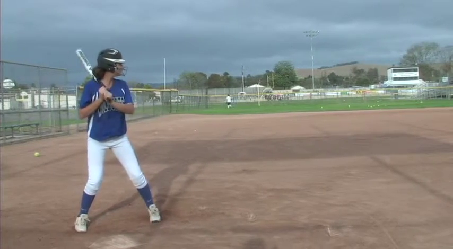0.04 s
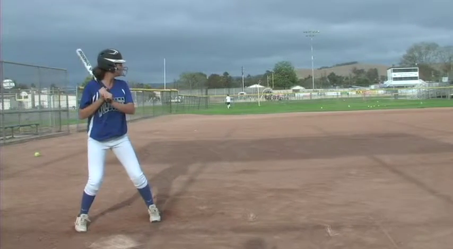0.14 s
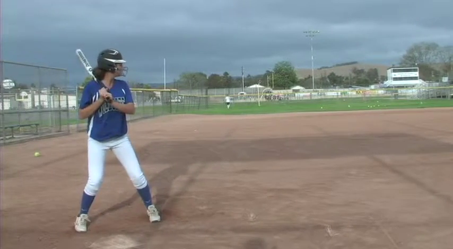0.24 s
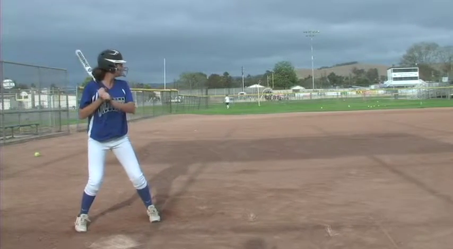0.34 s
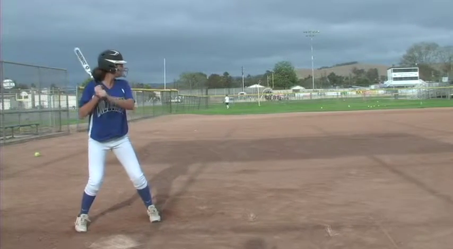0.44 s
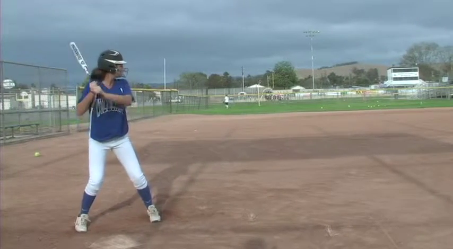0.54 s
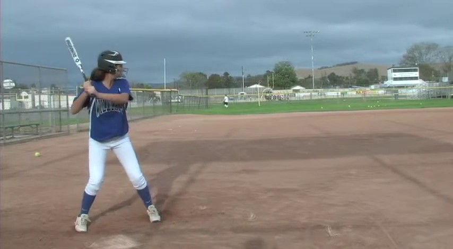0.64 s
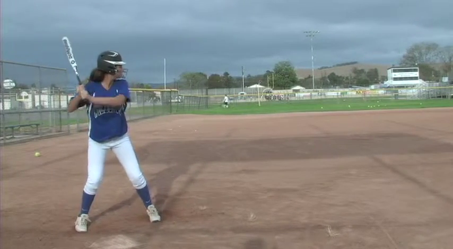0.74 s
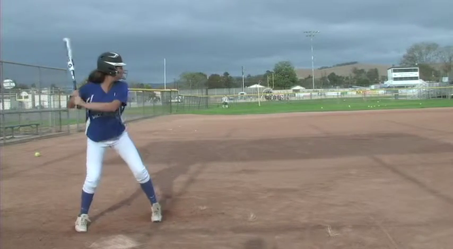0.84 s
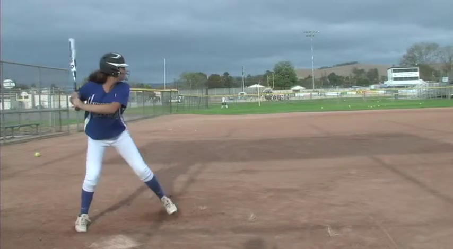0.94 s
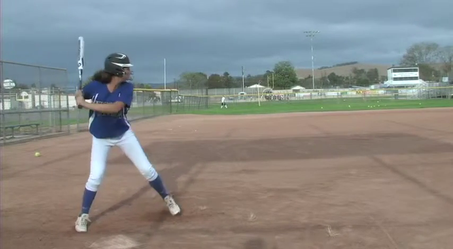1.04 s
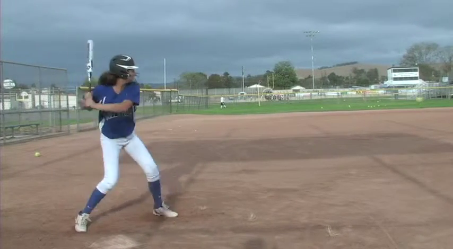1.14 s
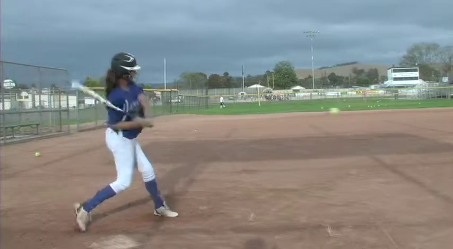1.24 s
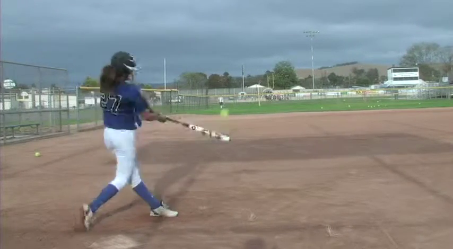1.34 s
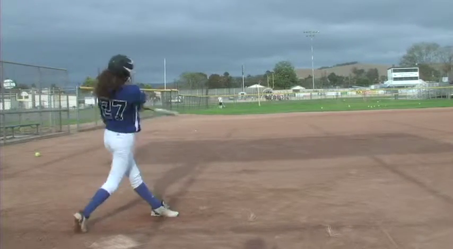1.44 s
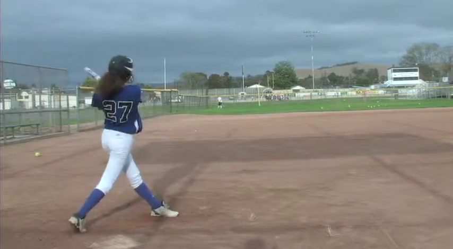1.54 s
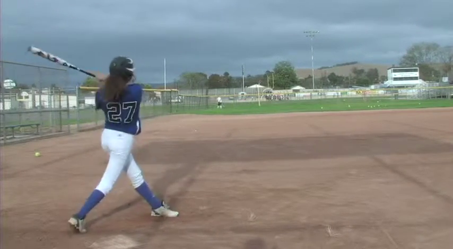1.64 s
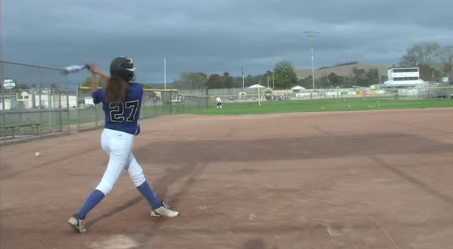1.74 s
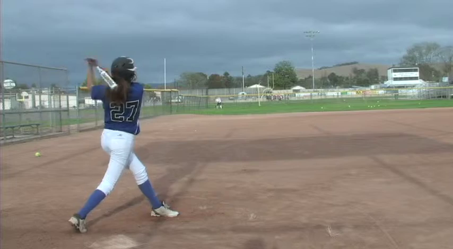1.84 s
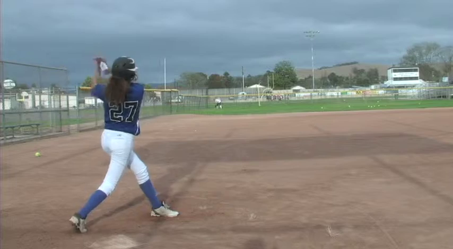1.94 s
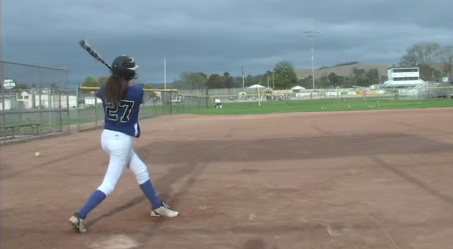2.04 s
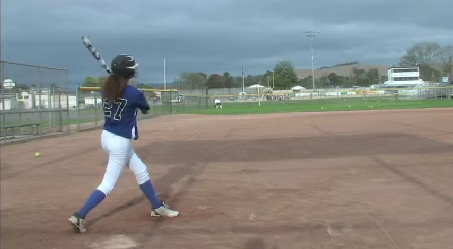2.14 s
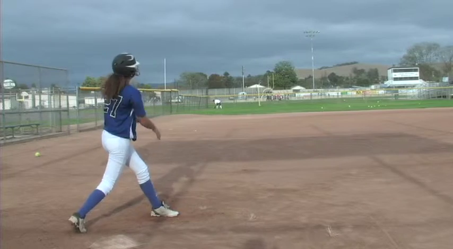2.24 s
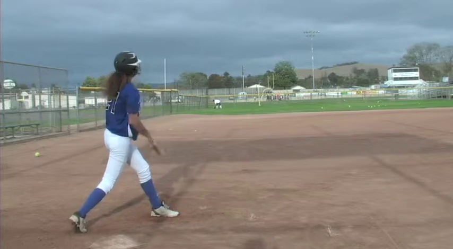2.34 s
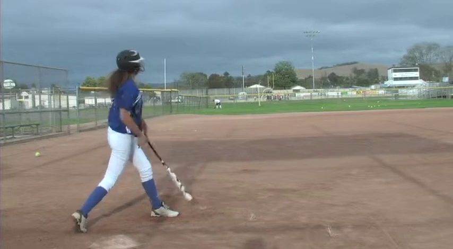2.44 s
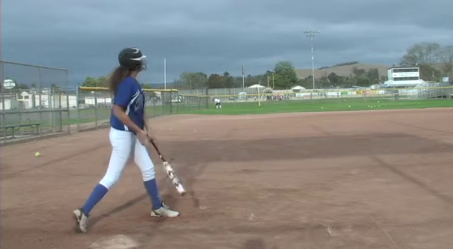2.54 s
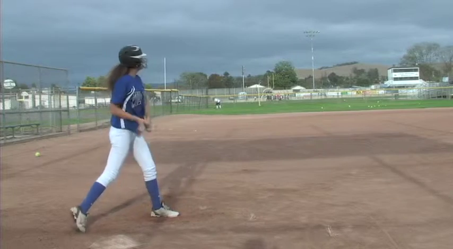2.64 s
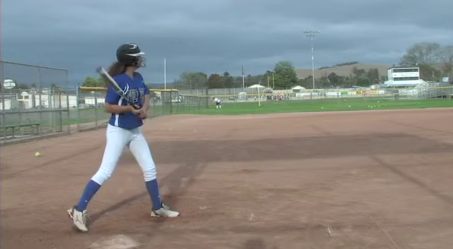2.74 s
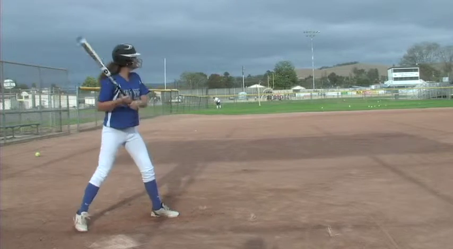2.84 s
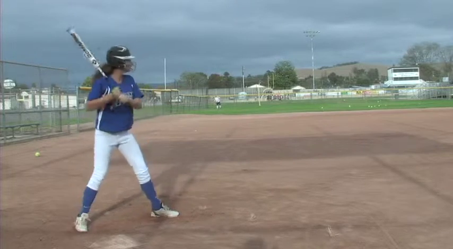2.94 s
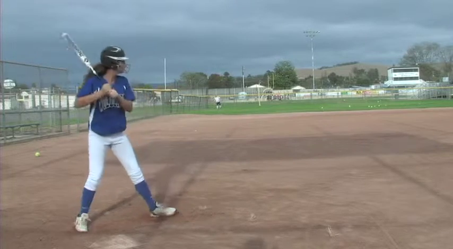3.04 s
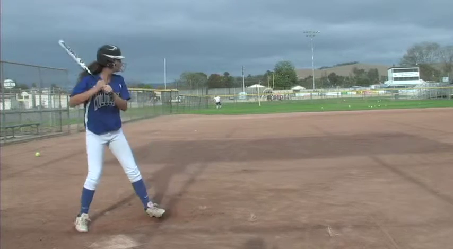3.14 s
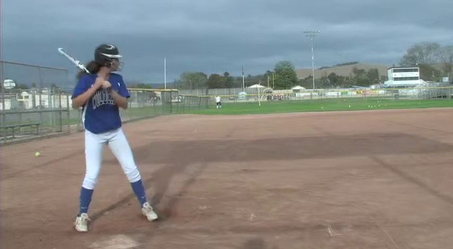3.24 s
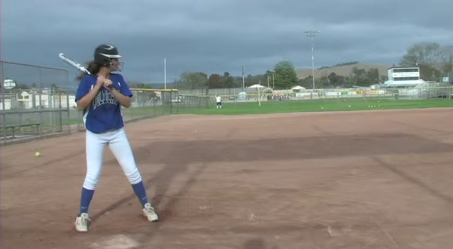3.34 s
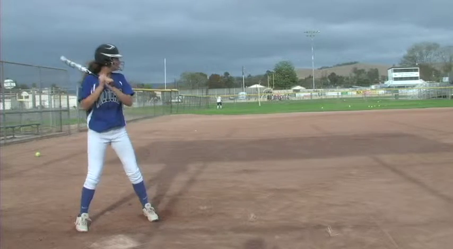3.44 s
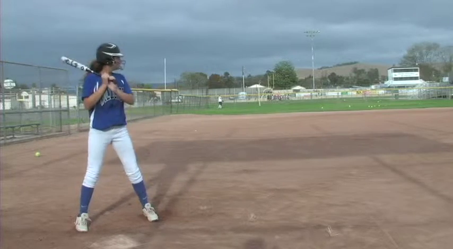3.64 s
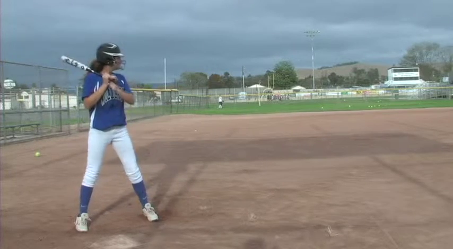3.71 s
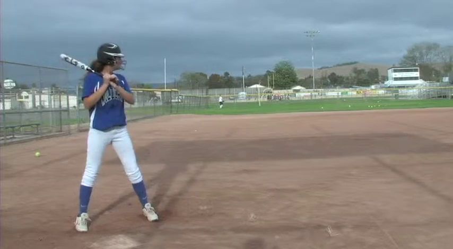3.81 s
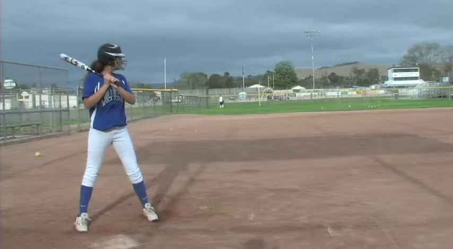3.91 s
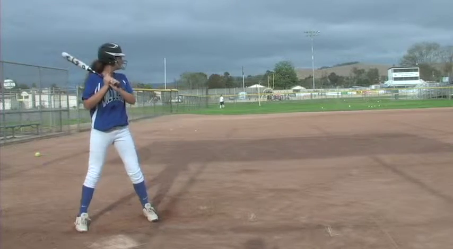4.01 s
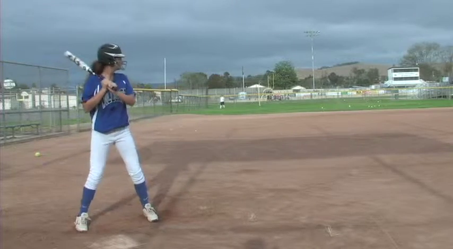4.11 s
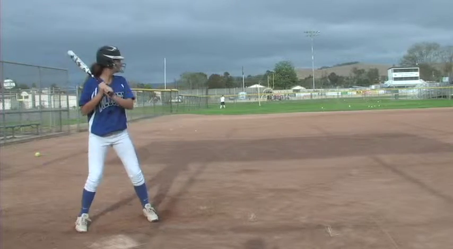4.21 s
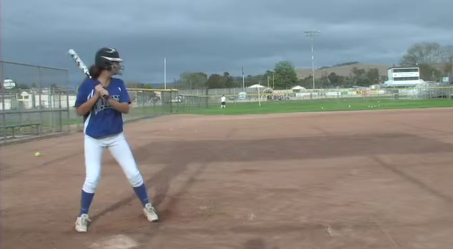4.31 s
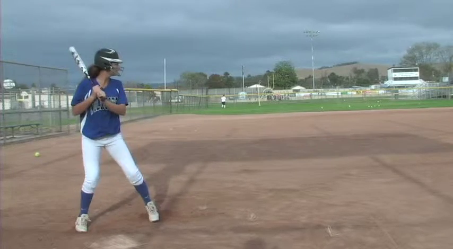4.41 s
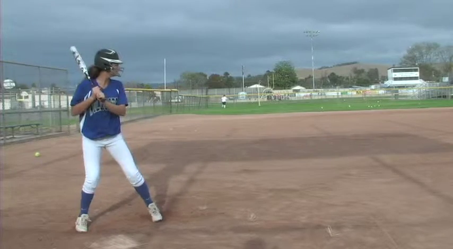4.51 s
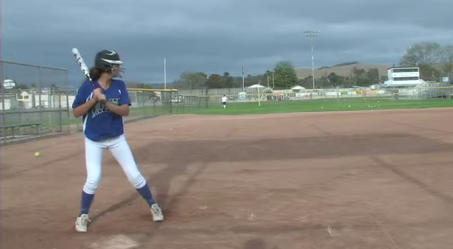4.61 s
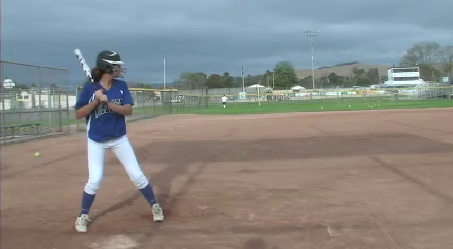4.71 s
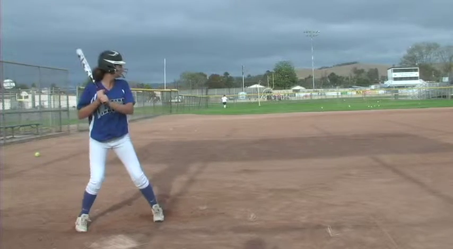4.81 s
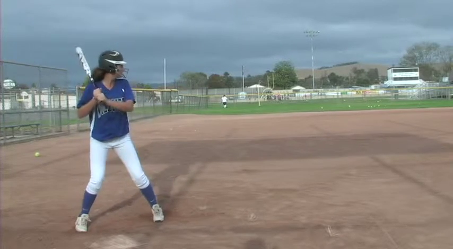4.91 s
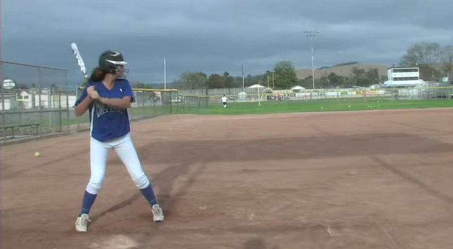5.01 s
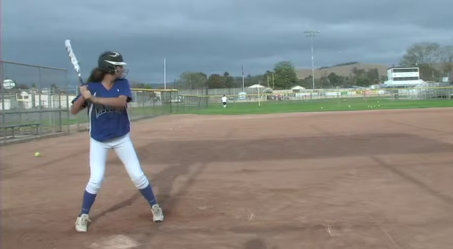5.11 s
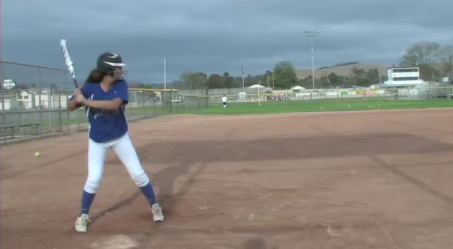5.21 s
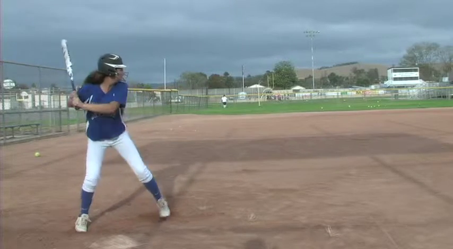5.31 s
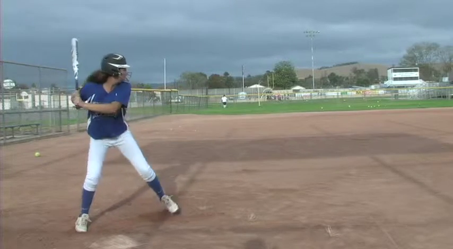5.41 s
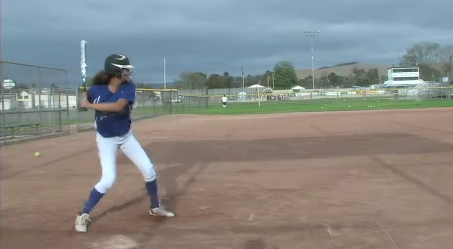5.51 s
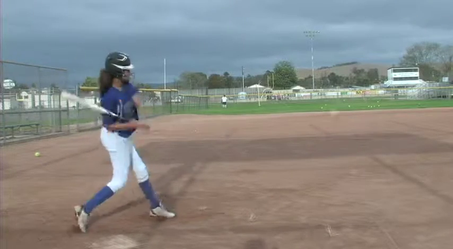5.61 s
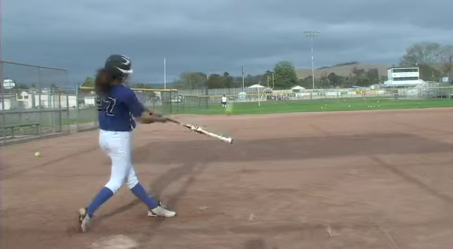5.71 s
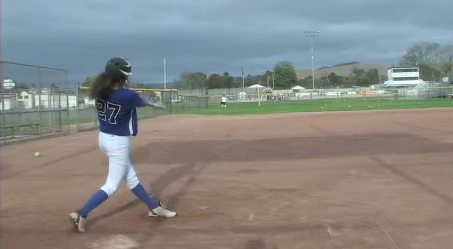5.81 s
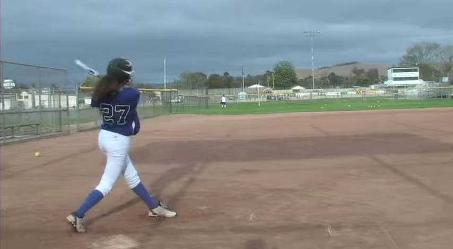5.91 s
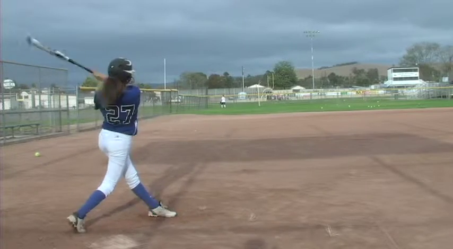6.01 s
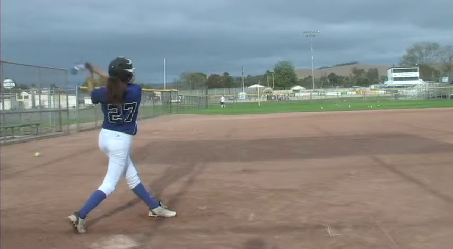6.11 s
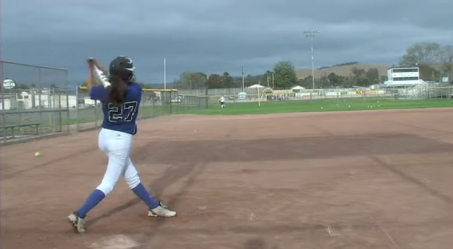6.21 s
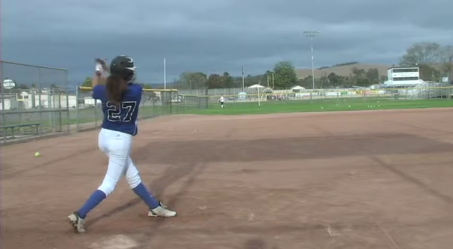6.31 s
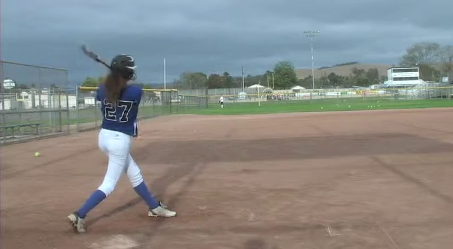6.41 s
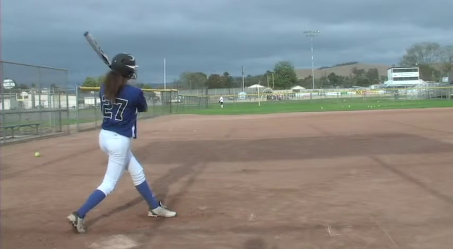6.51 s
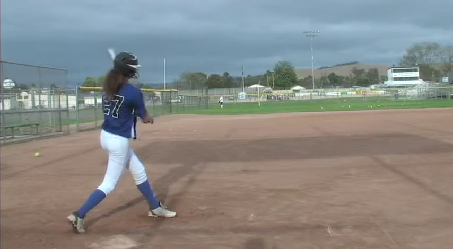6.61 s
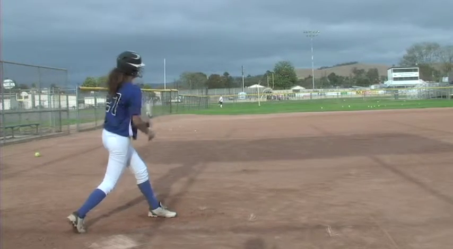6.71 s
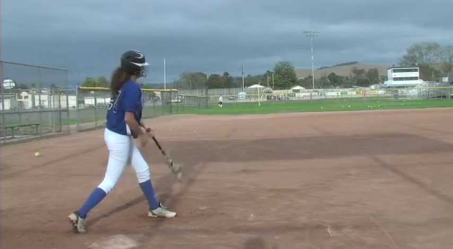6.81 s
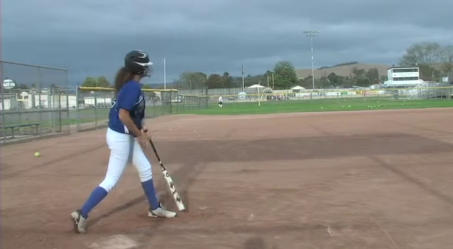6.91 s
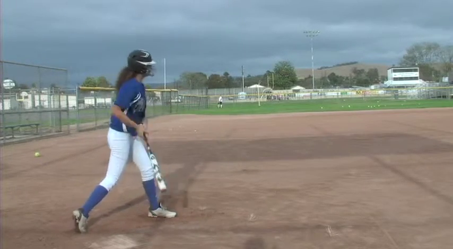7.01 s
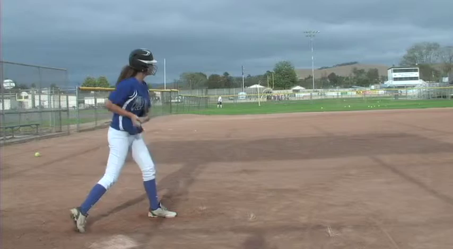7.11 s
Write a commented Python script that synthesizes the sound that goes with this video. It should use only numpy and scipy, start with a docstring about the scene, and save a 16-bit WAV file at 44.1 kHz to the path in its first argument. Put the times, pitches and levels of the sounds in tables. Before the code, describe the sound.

On an open softball field, a pitching machine hums quietly under a dull outdoor rush and light hiss. It fires a ball with a zip and a rubbery knock, and half a second later a bat cracks loudly close to the microphone, ringing briefly with quick echoes off the fences. Cleats scuff the dirt faintly. After about four seconds the knock and crack repeat.

```python
"""Batting practice on an open softball field.

From behind the plate: a humming wheel machine spits two balls, each with a zip and a rubbery knock.
Half a second later the bat cracks and rings close to the microphone, overloading it, and the cage
and fences throw back quick echoes. Cleats scuff the dirt over a dull rush and a light hiss;
a thin squeal comes and goes far off, and a puff of wind reaches the microphone at the end."""
import sys
import numpy as np
from scipy import signal
from scipy.fft import rfft, irfft, next_fast_len
from scipy.io import wavfile
from scipy.ndimage import map_coordinates

SR = 44100
rng = np.random.default_rng(int(sys.argv[2]) if len(sys.argv) > 2 else 0)


def file_out(sig):
    """Save sig as 16-bit WAV at sys.argv[1]."""
    # one column per channel
    cols = np.atleast_2d(sig).T
    # limit, then scale
    lim = np.clip(cols, -1, 1)
    pcm = np.round(lim * 32767).astype(np.int16)
    wavfile.write(sys.argv[1], SR, pcm)


N = 315315
WHEEL_HZ = 45.79  # turns a second of the machine's wheels
# Bat on ball. Each row: contact in seconds, level in dB, brightness in dB per octave,
# the barrel's hoop mode in dB, the swing's whoosh in dB.
BAT_HITS = [(1.3749, 8, -0.2, -11, -39), (5.7420, 7, -1.5, -44, -54)]
# Sound scattered around the field. Each row: frequency in Hz, relative level in dB.
SCATTER_SPECTRUM = [(90, 13), (200, -4), (320, 14), (550, 9.5), (900, -8.5), (1400, -4.5), (2200, -11),
                    (5500, -20), (11000, -13.5), (16000, -36)]


def amp(db):
    """Decibels to gain."""
    return 10 ** (np.asarray(db) / 20)


def unit(x):
    """Scale to rms 1."""
    return x / np.sqrt(np.mean(x ** 2) + 1e-20)


def clock(count):
    """Seconds for count samples."""
    return np.arange(count) / SR


def colour(x, spectrum):
    """Filter x by a curve of (Hz, dB) points and scale it to rms 1."""
    points_hz, points_db = np.transpose(spectrum)
    size = next_fast_len(len(x) + SR // 4)
    hz = np.fft.rfftfreq(size, 1 / SR)
    gain = amp(np.interp(np.log(hz + 1), np.log(points_hz), points_db)) * (hz > points_hz[0] / 2)
    return unit(irfft(rfft(x, size) * gain, size)[:len(x)])


def noise(spectrum, count):
    """Coloured noise of rms 1."""
    return colour(rng.standard_normal(count), spectrum)


def cut_bass(x, corner_hz):
    """First-order high-pass."""
    return signal.sosfilt(signal.butter(1, corner_hz, "high", fs=SR, output="sos"), x)


def wobble(rate):
    """A smooth random curve, rate knots a second."""
    coarse = clock(N)[::64]
    knots = rng.standard_normal(N // 100)
    return np.interp(clock(N), coarse, map_coordinates(knots, [coarse * rate], order=2, mode="wrap"))


def add(track, start, x):
    """Mix x into the track from start, in seconds."""
    part = track[max(round(start * SR), 0):][:len(x)]
    part += x[:len(part)]


def echoed(x, walls, bass_hz, treble_hz):
    """x and its echoes; each surface returns its own share of bass and treble."""
    bass = signal.sosfilt(signal.butter(3, bass_hz, fs=SR, output="sos"), x)
    treble = signal.sosfilt(signal.butter(2, treble_hz, "high", fs=SR, output="sos"), x)
    out = x.copy()
    for delay, bass_db, treble_db in walls:
        add(out, delay, amp(bass_db) * bass + amp(treble_db) * treble)
    return out


def ring(modes, t, attack):
    """Damped modes that build up over the contact time."""
    tones = sum(amp(db - 60 * t / t60) * np.sin(2 * np.pi * hz * t) for hz, db, t60 in modes)
    return tones * (1 - np.exp(-t / attack))


def snap(spectrum, t, decay):
    """A dense click: a noise burst, flattened in spectrum, then faded and coloured."""
    bins = rfft(rng.standard_normal(len(t)) * amp(-60 * t / decay))
    flat = irfft(bins / (np.abs(bins) + 1e-12), len(t))
    return colour(flat * amp(-10 * t / decay), spectrum)


def field_air(rush_db=-43.5, rise_db_per_s=0.0472, unrest_db=0.66, hiss_lift_db=1.0, throb_db=1.06):
    """The open field's dull rush, and a hiss that swells slowly and throbs with the spinning wheels."""
    # Rush and hiss. Each row: frequency in Hz, relative level in dB.
    rush_spectrum = [(25, -27), (45, 3.5), (75, -5), (110, 4), (250, 1), (470, 0), (650, 1.5), (1000, -6.5),
                     (1400, -6.5), (1950, -13.5), (2450, -12.5), (3200, -19), (8000, -33.5)]
    hiss_spectrum = [(1500, -30), (3200, -1), (5200, 2.5), (6300, 1.5), (8300, 0), (9200, -5),
                     (10200, -6.5), (12300, -16), (13500, -16), (14100, -29), (16000, -32)]
    # The hiss's swells. Each row: time in seconds, relative level in dB.
    swells = [(0, -54), (.55, -52.5), (.8, -55.5), (1.02, -50), (1.7, -51.5), (2.43, -54), (2.9, -50),
              (3.3, -53.5), (3.66, -49.5), (3.98, -55.5), (5.04, -51.5), (6.03, -52.5), (6.3, -50.5),
              (6.8, -52), (7.15, -49)]
    t = clock(N)
    rush = amp(rush_db + rise_db_per_s * t + unrest_db * wobble(19)) * noise(rush_spectrum, N)
    throb = throb_db * np.cos(2 * np.pi * WHEEL_HZ * t)
    hiss_db = np.interp(t, *np.transpose(swells)) + hiss_lift_db + throb
    return rush + amp(hiss_db) * noise(hiss_spectrum, N)


def machine_hum(motor_hz=53.5, motor_db=-59, flutter_db=2.0, tick_db=-61, drift=0.000882, waver=0.017):
    """The machine hums on multiples of its wheel speed; a wheel ticks once a turn, a fine high buzz."""
    # The hum's outline and the motors' high whine. Each row: frequency in Hz, rms level in dB.
    hum_outline = [(92, -51), (137, -52.5), (183, -48.5), (275, -50), (325, -55.5), (460, -62), (590, -53),
                   (660, -65.5), (770, -59.5), (1100, -68.5), (1300, -63.5), (1600, -65), (1950, -75),
                   (2550, -69), (2750, -74)]
    whine = [(5060, -67.5), (6191, -70), (6374, -68.5), (7278, -76)]
    # A wheel's tick. Each row: frequency in Hz, relative level in dB, t60 in seconds.
    tick_modes = [(5980, 0, 0.01), (7200, -4, 0.0074), (9240, -1.5, 0.012), (11700, -5.5, 0.0077),
                  (13200, -10, .008)]
    shaft_time = clock(N) + np.cumsum(drift * wobble(2.5)) / SR
    orders_hz = WHEEL_HZ * np.arange(2, 60)
    hum_hz, hum_db = np.transpose(hum_outline)
    orders_db = np.interp(np.log(orders_hz), np.log(hum_hz), hum_db)
    hum = np.zeros(N)
    for hz, db in [(motor_hz, motor_db), *zip(orders_hz, orders_db), *whine]:
        phase = 2 * np.pi * (hz * shaft_time + rng.random())
        phase += waver * np.sqrt(hz) * wobble(7)  # each tone wavers on its way across the field
        hum += amp(db + flutter_db * wobble(2.9)) * np.sqrt(2) * np.sin(phase)
    turns = shaft_time * WHEEL_HZ + 0.0065 * wobble(60)
    ticks = unit(ring(tick_modes, turns % 1 / WHEEL_HZ, attack=0.00044))
    return hum + amp(tick_db + wobble(2.15) + wobble(40)) * ticks


def pitches(grip_s=0.0035, release_s=0.0018, knock_lead_s=0.00336,
            zip_tail_db=-28, zip_tail_t60=0.39, knock_tail_db=-27, knock_tail_t60=0.31):
    """Rubber grips the ball ever harder and lets go at once; the squeezed tyres spring back and ring."""
    # Balls leaving the wheels. Each row: release in seconds, zip in dB, knock in dB, zip's bass cut in Hz.
    releases = [(0.866, -6, -1.5, 600), (5.2317, -7, -2.2, 2550)]
    # The zip. Each row: frequency in Hz, relative level in dB.
    zip_spectrum = [(300, 8.5), (1200, -17), (2500, -11), (4000, -9), (6000, -1), (8500, -3), (12000, -10),
                    (16000, -32)]
    # Tyres and frame. Each row: frequency in Hz, relative level in dB, t60 in seconds.
    tyre_modes = [(172, -7.5, 0.19), (206.6, -15, 0.34), (269, -13, 0.053), (321.4, -2, 0.053),
                  (506, -41, 0.026), (690, -25.5, 0.095), (786, -22.5, 0.061)]
    # Echoes off the backstop. Each row: delay in seconds, bass in dB, treble in dB.
    backstop = [(0.0099, -23, -72), (0.0265, -55, -42), (0.0277, -21.5, -21.5), (.0322, -36, -9),
                (0.0618, -22, -40), (0.065, -53, -28)]
    out, t = np.zeros(N), clock(SR)
    run_up_s = 0.5
    since_release = t - run_up_s
    squeeze = np.exp(np.minimum(since_release / grip_s, -since_release / release_s))
    for start, zip_db, knock_db, edge_hz in releases:
        shot = amp(zip_db) * squeeze * cut_bass(noise(zip_spectrum, SR), edge_hz)
        knock = cut_bass(ring(tyre_modes, t, attack=0.0037), corner_hz=45)
        add(shot, run_up_s - knock_lead_s, -amp(knock_db) * knock)
        add(out, start - run_up_s, echoed(shot, backstop, bass_hz=1400, treble_hz=2800))
        zip_tail = amp(zip_db + zip_tail_db - 60 * t / zip_tail_t60) * noise(zip_spectrum, SR)
        knock_fade = amp(knock_db + knock_tail_db - 60 * t / knock_tail_t60)
        add(out, start, zip_tail + knock_fade * noise(SCATTER_SPECTRUM, SR))
    return out


def flight_and_swing(ball_db=-43, approach_s=0.3, depart_s=0.045, sweep_s=0.03):
    """The spinning ball hisses louder as it nears the plate; the bat whooshes around the contact."""
    # Air past ball and bat. Each row: frequency in Hz, relative level in dB.
    whoosh_spectrum = [(150, 2), (400, 2), (1200, 2.5), (2500, -0.5), (5500, -9), (9000, -18), (15000, -48)]
    envelope, t = np.zeros(N), clock(N)
    for contact, *_, whoosh_db in BAT_HITS:
        flight = np.exp(-np.maximum((contact - t) / approach_s, (t - contact) / depart_s))
        swing = np.exp(-np.abs(t - contact) / sweep_s)
        envelope += amp(ball_db) * flight + amp(whoosh_db) * swing
    return envelope * noise(whoosh_spectrum, N)


def bat_hits(crack_db=-28, thump_lag_s=0.00052, hoop_hz=1880, ground_db=-16.0,
             scatter_db=-24.5, scatter_t60=0.31, mesh_db=-35, mesh_t60=0.41, spikiness=3.9):
    """A close crack and short ring over the ball's thump; posts and mesh scatter it into tiny echoes."""
    # The barrel's ring, the ball's hollow thump. Each row: frequency in Hz, relative dB, t60 in seconds.
    barrel_modes = [(1257, -14.5, 0.034), (1437, -21, 0.03), (1610, -41, 0.022), (2890, -19, 0.026),
                    (3105, -16.5, 0.024), (3556, -8, 0.021), (5200, -29, 0.031), (5420, -1, 0.0087),
                    (5880, -14, 0.016), (6830, -10, 0.024), (7760, -6.5, 0.016), (9300, -16, 0.016)]
    ball_modes = [(214, 0, 0.022), (279.4, 2, 0.025), (480, 10.5, 0.014), (563, 7, 0.014),
                  (880, -5.5, 0.015)]
    # The crack, and its echoes off wire mesh. Each row: frequency in Hz, relative level in dB.
    crack_spectrum = [(300, -36), (900, -2.5), (1400, -5.5), (2100, -0.5), (3300, -1), (4500, -6),
                      (5700, 2), (8300, -5.5), (11000, -9), (16000, -47)]
    mesh_spectrum = [(1000, -7), (2500, 5), (4000, 1.5), (5600, 6.5), (7500, 1), (10000, -13), (13000, -27),
                     (16000, -36)]
    # Echoes off the cage and fences. Each row: delay in seconds, bass in dB, treble in dB.
    cage = [(0.013, -16, -56), (0.022, -27, -24), (0.0304, -10, -21), (0.04, -29.5, -38), (0.056, -38, -52),
            (0.066, -42, -49), (0.069, -44, -32.5), (.0865, -32, -57)]
    out, t = np.zeros(N), clock(SR)
    for contact, db, brightness, hoop_db, _ in BAT_HITS:
        crack = amp(crack_db) * snap(crack_spectrum, t, decay=0.0086)
        barrel = [(hz, level + brightness * np.log2(hz / 2500), t60) for hz, level, t60 in barrel_modes]
        barrel.append((hoop_hz, hoop_db, 0.025))  # its strength depends on where the ball lands
        blow = crack + ring(barrel, t, attack=0.00048)
        add(blow, thump_lag_s, cut_bass(ring(ball_modes, t, attack=0.0034), corner_hz=170))
        heard = echoed(blow, cage, bass_hz=950, treble_hz=2500)
        add(heard, 0.0023, amp(ground_db) * crack)  # echo off the ground
        specks = rng.standard_normal(SR)
        spikes = np.sign(specks) * np.abs(specks) ** spikiness
        mesh = amp(mesh_db + brightness - 60 * t / mesh_t60) * colour(spikes, mesh_spectrum)
        build_up = 1 - np.exp(-t / 0.0033)  # the scattered sound needs time to come back
        scatter = amp(scatter_db - 60 * t / scatter_t60) * build_up * noise(SCATTER_SPECTRUM, SR)
        add(out, contact, amp(db) * (heard + mesh + scatter))
    return out


def cleats(grit_t60=0.0064, scuff_t60=0.015):
    """Grit cracks under the batter's pivoting back foot; cleats scuff the dirt as the feet reset."""
    # Cracks and scuffs. Each row: start in seconds, level in dB.
    grit_cracks = [(1.4514, -28), (1.46, -31), (1.472, -31), (5.864, -30), (5.879, -28.5)]
    scuffs = [(2.138, -43), (2.16, -35), (2.6505, -32)]
    # Grit and dirt. Each row: frequency in Hz, relative level in dB.
    grit_spectrum = [(1500, -18), (3500, -8), (5600, 9), (7500, -9), (10000, -24), (16000, -40)]
    dirt_spectrum = [(200, -14), (1100, -9), (1600, 14), (2200, 2), (3500, -5), (7000, -18), (15000, -45)]
    out, t = np.zeros(N), clock(SR // 4)
    for start, db in grit_cracks:
        add(out, start, amp(db - 60 * t / grit_t60) * noise(grit_spectrum, len(t)))
    for start, db in scuffs:
        add(out, start, amp(db - 60 * t / scuff_t60) * noise(dirt_spectrum, len(t)))
    return out


def far_squeals():
    """A faint thin tone comes and goes in the distance."""
    # The squeals. Each row: start in seconds, length in seconds, pitch in Hz, rms at the crest in dB.
    squeals = [(2.66, .14, 2105, -61), (4.075, 0.22, 2120, -56), (5.04, .13, 2115, -59)]
    out = np.zeros(N)
    for start, length, hz, db in squeals:
        t = clock(int(length * SR))
        swell = np.sqrt(np.abs(np.sin(np.pi * t / length)))
        phase = 2 * np.pi * hz * t + 0.5 * wobble(50)[:len(t)]
        add(out, start, amp(db) * np.sqrt(2) * swell * np.sin(phase))
    return out


def wind_puff(full_at_s=7.12, full_db=-38, rise_s=0.062):
    """Wind swells against the microphone with a soft rumble."""
    # The rumble. Each row: frequency in Hz, relative level in dB.
    rumble_spectrum = [(24, -6), (45, 10), (70, -24), (200, -40), (1000, -90)]
    swell = np.exp(np.minimum(clock(N) - full_at_s, 0) / rise_s)
    return amp(full_db) * swell * noise(rumble_spectrum, N)


def scene():
    """Everything at one microphone behind the plate."""
    practice = machine_hum() + pitches() + flight_and_swing() + bat_hits() + cleats()
    return (field_air() + practice + far_squeals() + wind_puff())[None]


def record(dry, overload=1.3, top_hz=15900):
    """The input overloads on the hits, sheds the deepest bass, clips again and cuts the top treble."""
    overloaded = cut_bass(np.clip(dry[0], -overload, overload), corner_hz=40)
    band_limit = signal.butter(12, top_hz, fs=SR, output="sos")
    return signal.sosfilt(band_limit, np.clip(overloaded, -1, 1))[None]


dry = scene()
out = record(dry)
file_out(out)
```